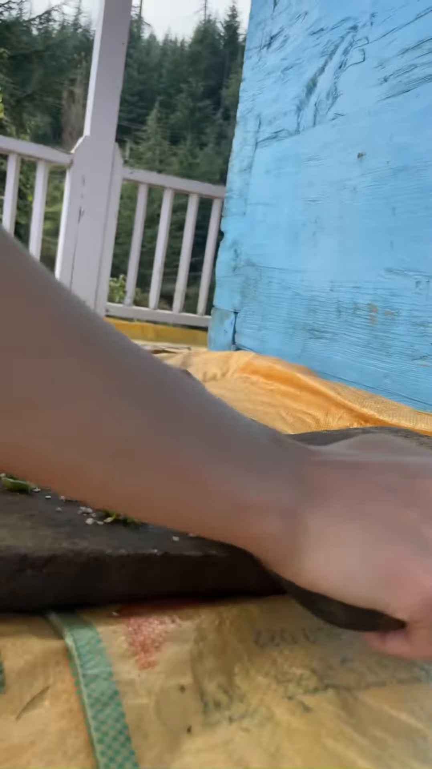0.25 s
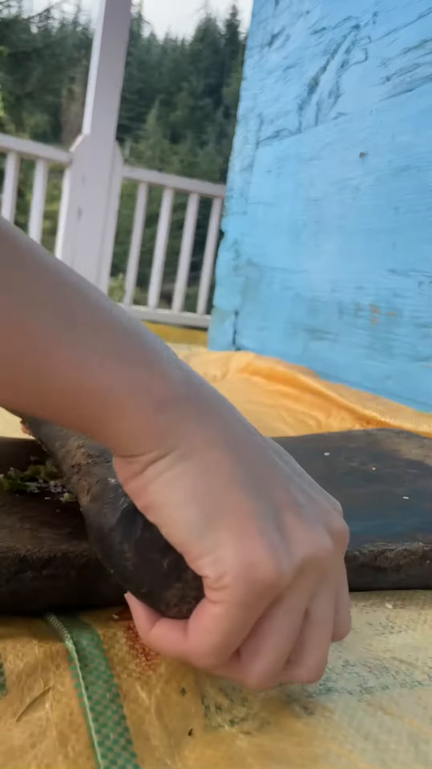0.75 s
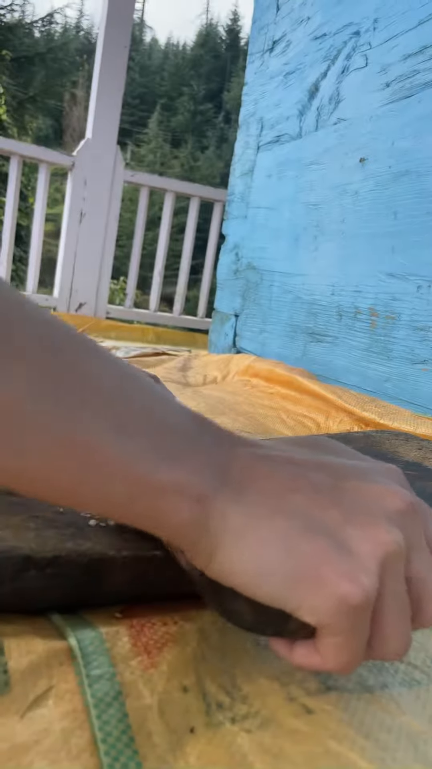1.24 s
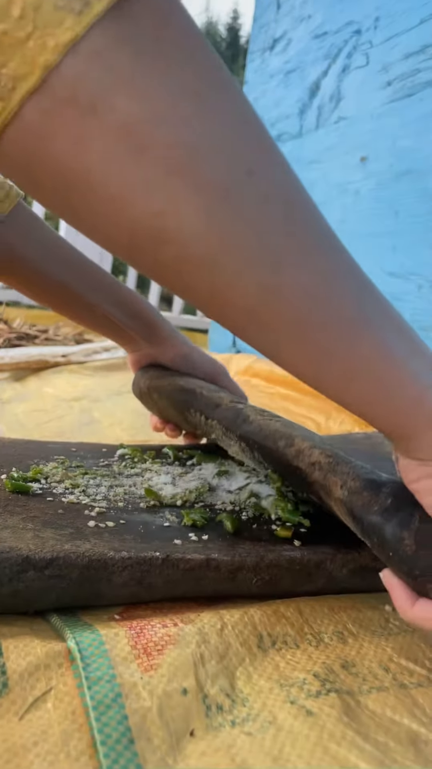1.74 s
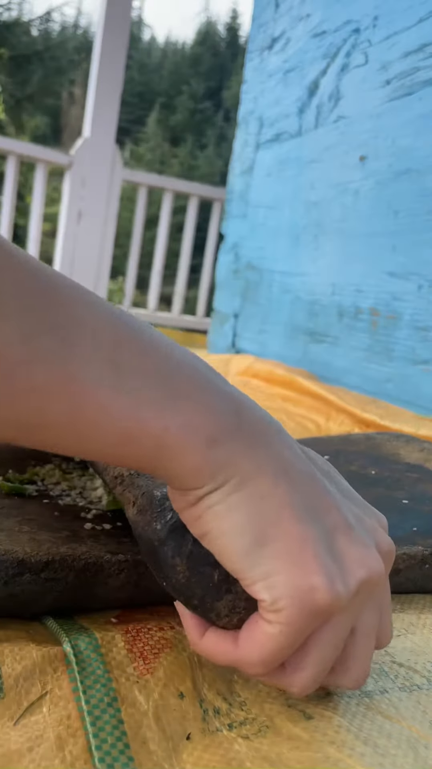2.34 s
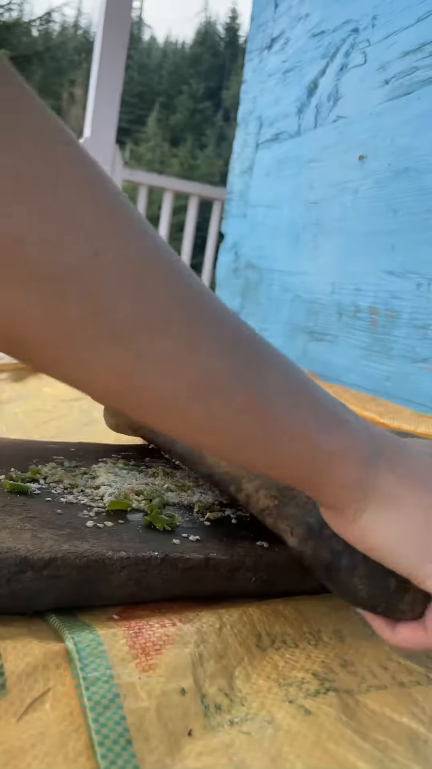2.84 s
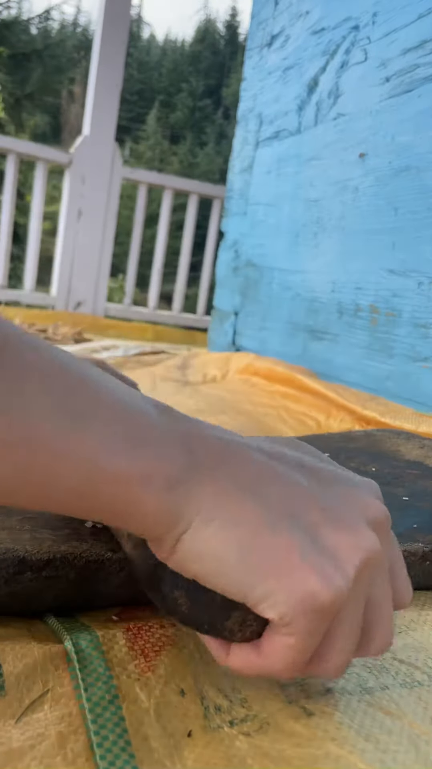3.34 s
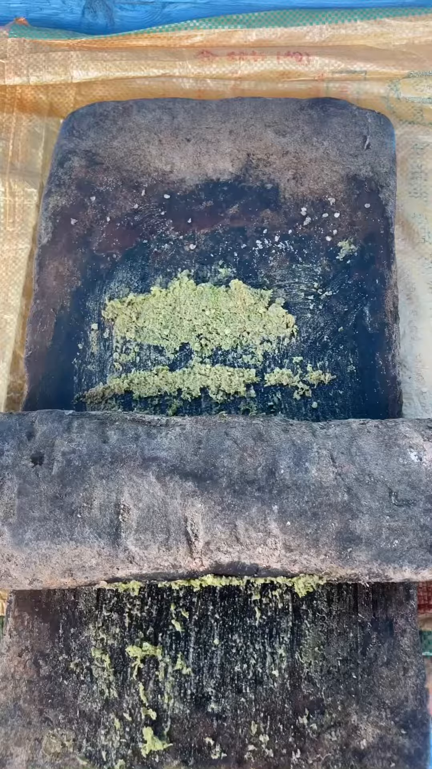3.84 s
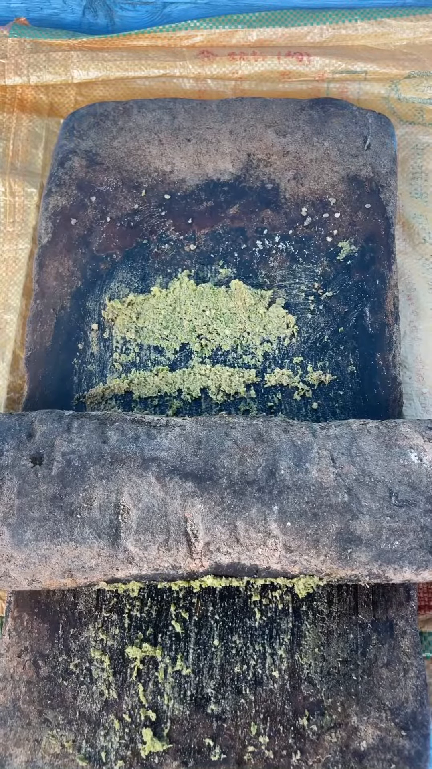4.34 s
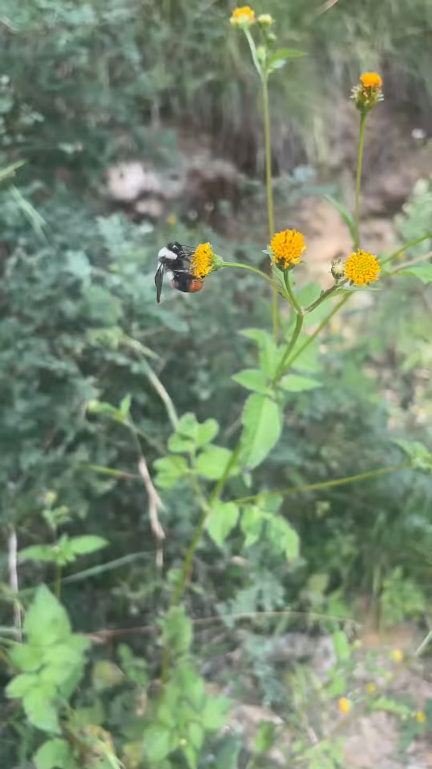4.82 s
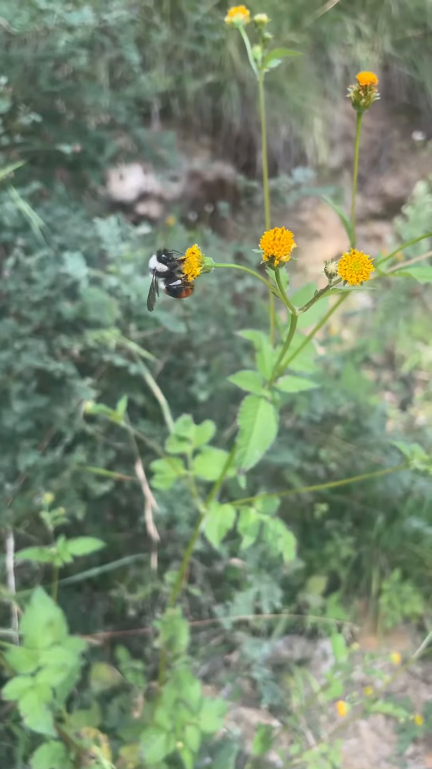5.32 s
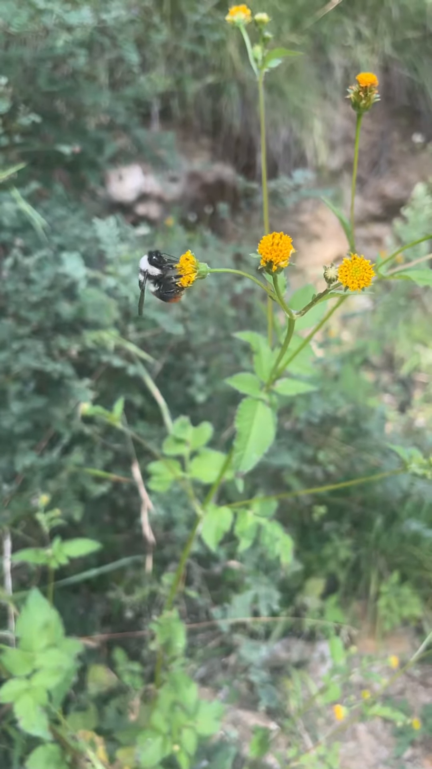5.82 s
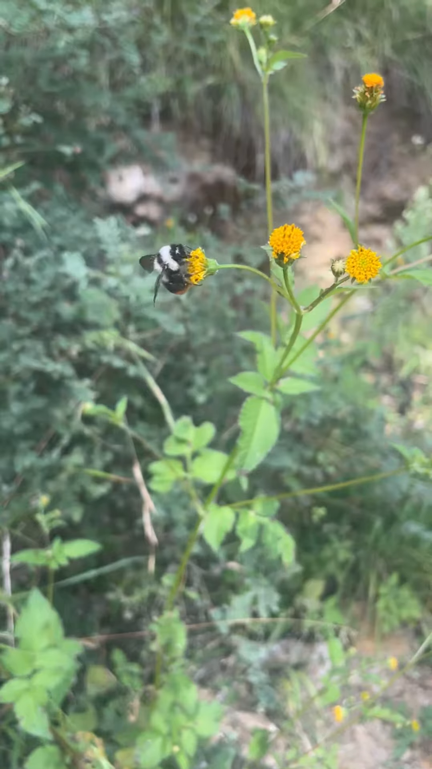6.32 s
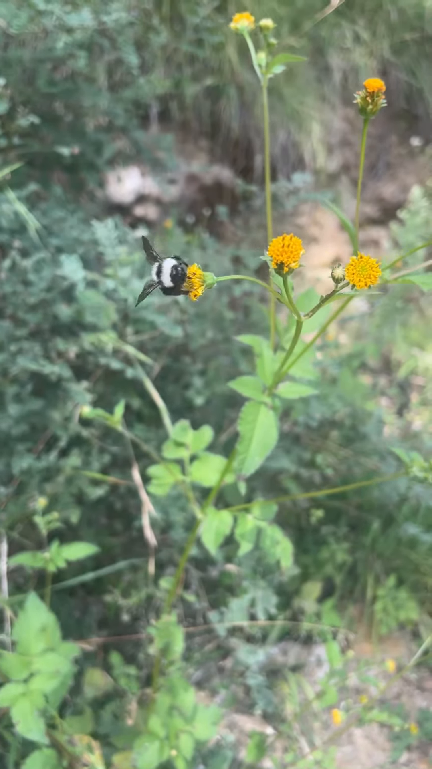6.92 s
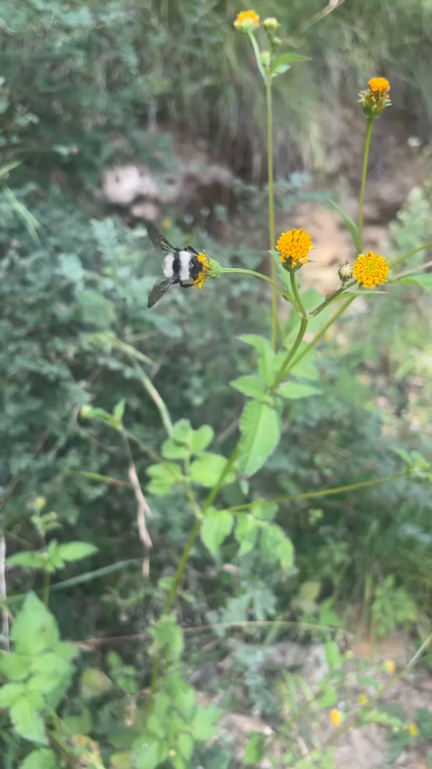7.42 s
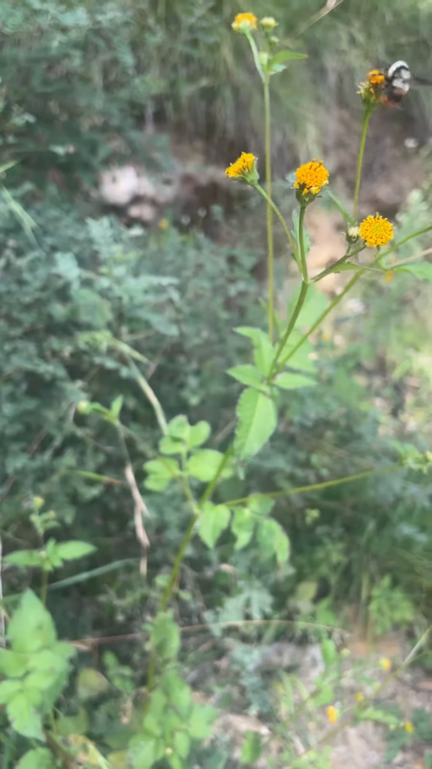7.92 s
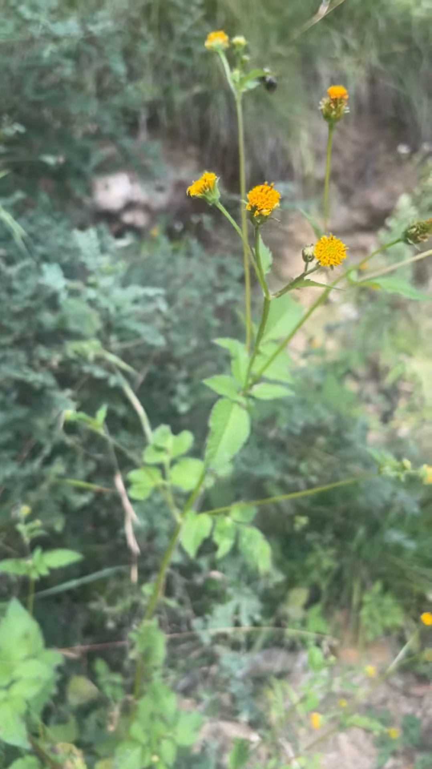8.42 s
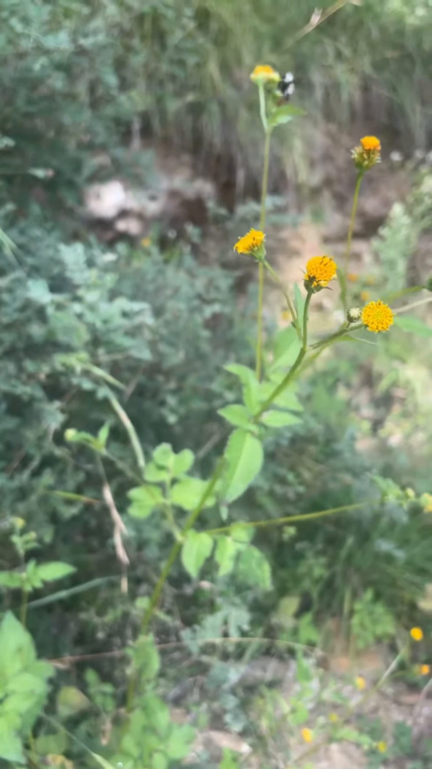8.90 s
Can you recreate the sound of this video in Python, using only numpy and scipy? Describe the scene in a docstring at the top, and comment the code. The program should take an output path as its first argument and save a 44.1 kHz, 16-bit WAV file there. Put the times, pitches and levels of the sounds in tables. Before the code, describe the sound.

Close by on a porch, a stone roller crushes seeds on a slab in repeated gritty strokes, with small snaps, rumbling floorboards and one loud knock. Faint cicadas and a bird sound beyond. The grinding stops, and after a quiet second the sound cuts to a meadow full of loud cicadas. Light wind buffets the handheld microphone and a bumblebee buzzes off in short bursts.

```python
"""Grinding stone on a porch, then a meadow.

Close by, a stone roller crushes seeds on a slab and shakes the porch boards; cicadas and a bird are outside.
After a quiet second we stand in a meadow: loud cicadas click all around, light wind buffets the
handheld microphone pair and a bumblebee buzzes off. The last instant is the porch again.
In the treble, bands lie alternately in and out of phase between left and right."""
import sys
import numpy as np
from scipy import signal
from scipy.fft import rfft, irfft
from scipy.io import wavfile
from scipy.ndimage import uniform_filter1d

SR = 44100
rng = np.random.default_rng(int(sys.argv[2]) if len(sys.argv) > 2 else 0)


def generate_wav(signal):
    """Clip the signal to [-1, 1] and save it as 16-bit WAV at the path in sys.argv[1]."""
    frames = np.transpose(np.atleast_2d(signal))
    scaled = np.clip(frames, -1, 1) * 32767
    pcm = np.round(scaled).astype(np.int16)
    wavfile.write(sys.argv[1], SR, pcm)


N = 403956
STILL_S, MEADOW_S, BACK_S = 3.815, 4.822, 9.113  # grinding stops; meadow begins; back on the porch

# stereo spread of each place and of the treble: f/Hz, left lead/rad, likeness/0-1, left minus right/dB
PORCH_STEREO = [(30, 0, 0.99, 0), (150, 0, 0.99, 1.5), (307, 0.96, 0.94, 3.5), (546, -1.84, 0.83, 5.5),
                (930, -2, 0.94, -0.5), (1299.6, -2, .4, -2.5), (1670, 1.8, .75, 0.5),
                (2300, 0.49, .75, -3.5), (3020, 2, 0.2, -2.5), (3770, 1.4, 0.39, 0.5),
                (4230, 1.34, 0.68, -3), (4830, 1.5, 1, 0), (5170, -0.57, .92, 0)]
MEADOW_STEREO = [(30, 0, 0.56, -0.5), (299, -0.5, 0.075, 1.5), (532, -4, 0.55, 4), (930, -1, 0.18, 0),
                 (1370, -1.5, 0.07, -1.5), (1860, 1.4, 0.1, -1.5), (2630, 3.5, 0.81, 2.5),
                 (2890, 2.5, 1, -1), (2980, -3.5, 0.7, 2), (3650, 0.2, 0.25, 2.5), (4390, 2, .5, -0.5),
                 (4720, 3, 0.54, 1.5), (4830, .5, 0.95, 1.5), (5130, -0.14, 0.84, 0)]
TREBLE_STEREO = [(7100, 2.8, .97, .5), (7230, np.pi, 1, 0), (8400, np.pi, 1, 0), (9390, 3.8, .7, -0.5),
                 (9750, 5.9, .8, 0), (10400, 2 * np.pi, 0.96, 1), (11700, 2 * np.pi, 1, -1.5),
                 (12500, 7, .6, 0.5), (13260, 3 * np.pi, 1, 0), (15190, 3 * np.pi, 1, 0),
                 (15800, 9, .8, -2.5)]
# spectra of the faint background air: f/Hz, density/dB
PORCH_AIR = [(25, -17), (45, -5), (80, 4), (130, -6.5), (250, -12), (500, -15), (750, -4.5), (950, -16),
             (1300, -25.5), (2000, -24.5), (3000, -20), (3600, -26)]
MEADOW_AIR = [(25, -7), (45, 7.5), (80, -2), (130, -6), (250, -4), (500, -3), (750, 0.5), (950, -13.5),
              (1300, -21.5), (2000, -40), (3000, -43), (3600, -16.5)]
# spectra of the cicada chorus: f/Hz, density/dB
PORCH_CICADAS = [(3000, -29), (3700, -22.5), (4200, -10.5), (4800, -1.5), (5300, 1.5), (6200, -5.5),
                 (7200, -10.5), (7900, -24.5), (8800, -34.5), (9800, -27), (11700, -15.5), (14000, -15.5),
                 (15500, -26)]
MEADOW_CICADAS = [(3000, -52.5), (3700, -29), (4200, -16.5), (4800, -3.5), (5500, -0.5), (6900, 0),
                  (7600, -7.5), (8300, -15), (8900, -32), (9600, -29.5), (11500, -27), (13000, -33.5),
                  (15500, -30)]
# course of the chorus: t/s, level/dB, overtone band boost/dB
PORCH_CHORUS = [(0, -55, -4), (1, -52, 1.5), (2, -53, 1.5), (3.8, -53.5, -1.5), (3.83, -54.5, -1),
                (4.3, -54, 4), (4.81, -54, -1)]
MEADOW_CHORUS = [(4.83, -37, -0.071), (6.8, -38, -0.24), (8.12, -37, 1), (9.039, -35.5, -1.15)]
# meadow cicadas near the microphone: f/Hz, width/Hz, level/dB, pulse rate/Hz, sounding share/0-1
SINGERS = [(4524, 86, -58.5, 34, 0.85), (5130, 135, -51, 31.1, 0.64), (6080, 210, -49.5, 51, 1),
           (6660, 130, -48.5, 31.1, 0.94), (7210, 250, -48, 35.3, 0.43), (7870, 210, -50, 23, 0.48)]
# breeze between the gusts: t/s, level/dB
BREEZE = [(4.82, -80.5), (6.15, -65), (7.2, -67.5), (9.16, -62.5)]
# gusts on the microphone: t/s, rush/dB, thump peak/dB, thump f/Hz
GUSTS = [(5.64, -71.5, -65.5, 55), (6.108, -50.5, -56, 46), (6.53, -55.5, -54, 48.1), (6.833, -56, -34, 62),
         (7.279, -58, -61.5, 54.4), (7.48, -59.5, -64.5, 56), (7.998, -49.5, -60, 65.6),
         (8.111, -54, -47.5, 61.9), (8.528, -49.5, -52, 53.3), (8.789, -49.5, -47, 64.3),
         (9.05, -53.5, -60.5, 57.3)]
# fingers on the microphone: t/s, level/dB
FINGER_TAPS = [(5.975, -53), (7.883, -61), (8.107, -56), (8.528, -57), (8.71, -66)]
# bird notes, and faint low hums on the porch: t/s, length/s, from f/Hz, to f/Hz, level/dB, waver/Hz
BIRD_NOTES = [(.305, 0.076, 3480, 3370, -63, 80), (.43, 0.085, 2910, 2860, -52.5, 11),
              (4.14, 0.045, 3103, 2970, -65, 240), (4.135, 0.072, 2390, 2286, -69, 160),
              (4.19, 0.32, 2915, 2500, -68, 55), (4.46, 0.13, 2470, 2550, -68.5, 110)]
HUMS = [(2.25, 0.37, 244.4, 258.8, -58, 7.7), (2.74, 0.14, 209, 214, -50.5, 4.9),
        (2.79, 0.06, 387.6, 436, -51, 6.9), (2.98, 0.044, 387, 408, -53, 8)]
# envelope of the bee's wing harmonics: f/Hz, level/dB
WING_SPECTRUM = [(170, -2), (380, 1), (570, -2.5), (780, -6.5), (1000, -17), (1400, -19.5), (2300, -19.5)]
# air torn off the wings: f/Hz, density/dB
WHIRR_SPECTRUM = [(300, -39), (700, 2), (1200, -6), (2400, -19), (3200, -14.5)]
# buzzes, each a hover with one surge: t/s, length/s, hover level/dB, hover f/Hz,
# surge delay/s, surge half width/s, surge boost/dB, pitch lift/Hz, relative whirr/dB
BUZZES = [(7.465, 0.43, -55, 172, .13, 0.085, 5, 20, -16.5),
          (7.99, 0.29, -67, 185.5, 0.16, 0.03, 14.5, 11.5, -3.5),
          (8.302, .27, -73.5, 183.3, 0.19, 0.042, 6.5, -4.5, -2),
          (8.601, 0.3, -63, 184, 0.0575, 0.049, -3, 6, -18), (8.94, .17, -78, 187.4, 0.074, .05, 0, 3, 3)]
# modes of the porch boards: f/Hz, width/Hz, level/dB
BOARD_MODES = [(44.8, 24, -7), (70, 16, 0), (98, 25, 2), (126, 20, 4), (193, 34, -6.5), (262.6, 18, -19.5),
               (397, 90, -29)]
# modes of the two stones: f/Hz, level/dB, t60/s
SLAB_MODES = [(189, -8, 0.083), (270, -10.5, 0.076), (377.4, -19.5, 0.11), (608.3, 3, 0.09),
              (805.3, -14.5, 0.05), (895.6, 3, 0.027), (989, -10, 0.025), (1230, -27.5, 0.019),
              (1797, -23.5, 0.07), (1940, -17, 0.022), (2212, -24.5, 0.05)]
ROLLER_MODES = [(880, -3.5, 0.024), (962, -2, 0.051), (1240, -7, 0.03), (1780, -16.5, 0.034),
                (2370, -9.5, 0.016), (2784, -22.5, 0.018), (3270, -20, 0.031)]
# their ring bends as the load on the slab shifts and the roller tips: t/s, pitch factor
SLAB_BEND = [(0, 0.93), (.2, 1.035), (.5, 1.01), (.6, 0.98), (0.729, 1.01), (1.0, 1.02), (1.05, 0.99),
             (1.15, 1.045), (1.8, 0.99), (1.9, 1.01), (2.05, 0.98), (2.5, 1.05), (2.59, .94), (2.69, 1.01),
             (3.0, 0.97), (3.06, 0.98), (3.14, 1), (3.45, 0.98), (3.6, 1.07)]
ROLLER_BEND = [(1.6, 0.93), (1.72, 1.03), (1.93, 1.07), (2.0, 1.04), (2.2, .995), (2.4, 0.86)]
# spectra of coarse grit, fine grit and the rattle after a blow: f/Hz, density/dB
COARSE_GRIT = [(700, -29.5), (1100, -7), (1400, -13), (2100, -4), (3000, -2.5), (4200, -6.5), (6000, -7.5),
               (9000, -23), (15500, -38)]
FINE_GRIT = [(2500, -29), (4200, -8.5), (5300, -2), (6700, -4.5), (8300, 1), (9500, -3), (11000, -7),
             (12000, -11), (15500, -17)]
RATTLE = [(300, -29.5), (700, -3.5), (1000, 1), (1400, -15), (2200, -9), (3200, -27), (6000, -42)]
# boards jolt under the slab: t/s, peak/dB, f/Hz, t60/s, hollow knock/dB
THUDS = [(0.083, -30.5, 88.7, 0.13, -56), (0.198, -34, 99, 0.22, -58), (0.626, -31, 73, 0.082, -65),
         (0.833, -44, 109, 0.32, -65), (0.934, -30.5, 93, 0.053, -35), (1.242, -44.5, 214, 0.17, -42),
         (1.247, -49, 385, 0.092, -58), (1.599, -15, 87.3, 0.15, -31), (1.62, -14, 109.1, 0.091, -35.5),
         (1.669, -24, 96.2, 0.16, -37), (2.574, -28.5, 134, 0.087, -31.5), (2.6, -32, 117.1, 0.069, -33),
         (3.015, -28, 56.3, 0.2, -51), (3.149, -34.5, 104.1, 0.29, -62), (3.379, -24.5, 151.5, 0.062, -24),
         (3.401, -18, 104.6, 0.03, -28), (3.732, -32.5, 70.1, 0.19, -58), (3.777, -27.5, 41, 0.054, -65)]
# seeds snap: t/s, ring/dB, f/Hz, crack/dB
SNAPS = [(0.2312, -36.5, 1090, -61), (0.577, -58, 2390, -40), (0.7021, -43, 2374, -34),
         (0.753, -42.5, 1281, -56), (0.945, -59, 2430, -42), (2.234, -64, 2260, -60),
         (2.317, -62, 2400, -49.5), (2.7213, -46, 1510, -64), (3.099, -40, 1960, -38),
         (3.199, -53, 1030, -57)]
# roller strikes the slab: t/s, peak/dB, contact/ms, roller ring against slab/dB
KNOCKS = [(0.194, -34, 1.9, -13), (1.592, -3, 0.47, -6.5), (2.573, -51, 1.3, -1), (2.674, -41, 1.1, -9),
          (3.05, -30.5, 0.56, -1), (3.376, -21.5, 1.63, -1)]
# roller strokes: t/s, rise of weight/s, of coarse grit/s, of fine grit/s, length/s, lift-off/s,
# then five layers: boards/dB, slab/dB, roller/dB, coarse grit/dB, fine grit/dB
STROKES = [(-.1, 0.27, .17, 0.21, 0.33, 0.068, -35.5, -46, -68, -48.5, -42),
           (0.314, 0.36, 0.14, .15, 0.43, 0.075, -41.5, -52.5, -58.5, -54.5, -47.5),
           (0.84, 0.22, 0.22, 0.2, 0.3, 0.098, -37.5, -48.5, -64, -53.5, -46),
           (1.172, 0.094, 0.059, 0.054, .11, 0.11, -48.5, -61, -63.5, -58, -58),
           (1.573, 0.33, 0.42, 0.39, .53, 0.12, -34.5, -37.5, -42, -53, -57),
           (2.336, 0.26, 0.223, 0.26, 0.35, 0.083, -37, -45.5, -56.5, -48.5, -44),
           (2.771, 0.302, 0.213, 0.077, 0.388, 0.063, -39.5, -47.5, -55, -52, -48),
           (3.218, 0.36, 0.29, 0.32, 0.34, 0.086, -35.5, -43, -58.5, -48.5, -43),
           (3.653, 0.056, 0.17, 0.1, 0.24, 0.047, -49, -61.5, -64.5, -52, -48)]
# a stroke's shape, one row per layer: rise depth/dB, rise exponent, sag/dB, loss per lift-off time/dB
STROKE_SHAPES = [(21.3, 1, 2.5, 12.5), (31, 1.2, 9, 29), (26, 1.3, 9.5, 24), (24.4, 1.6, 2.5, 26),
                 (24.2, 1.6, 2.5, 29.5)]
# the roller bites or slips: t/s, half width/s, swell of boards/dB, of slab/dB, of roller/dB
BITES = [(.15, .04, 1.5, 0, 1), (.7, 0.022, 2.5, 4, -6), (1.06, .04, -4.5, 5.5, 3), (1.15, 0.022, 2, 8, 2),
         (1.83, 0.025, -4, -1, 1), (1.87, 0.017, -3.5, -2, 1), (1.94, 0.022, -0.5, 0.5, 3.5),
         (2.015, 0.014, 2, 5, 0), (2.09, .025, 0.5, -2.5, 3), (2.48, 0.023, 1.5, 1, -1),
         (2.95, 0.027, 1.5, 3, 6), (3.13, 0.017, -3, 1, 6), (3.465, 0.024, 4, 4, -5),
         (3.53, 0.017, -1.5, 6.5, -4), (3.6, .025, 5, 14, 5)]
# a heap of seeds gives way: t/s, half width/s, swell of coarse grit/dB, of fine grit/dB
CRUNCHES = [(.50, 0.022, 3.5, 2), (1.88, 0.034, -0.5, 4), (2.10, 0.05, -0.5, 8.5), (2.33, 0.022, 8, 11),
            (2.55, 0.05, 3.5, 3), (2.635, 0.029, 7, 6), (2.87, 0.049, 3.5, 1.5), (3.075, 0.049, 7.5, 8.5),
            (3.3, 0.026, 5, 9), (3.56, .03, 3, -1.5)]

TIME, FREQS = np.arange(N) / SR, np.fft.rfftfreq(N, 1 / SR)


def gain_of(db):
    """dB to gain."""
    return 10 ** (np.asarray(db) / 20)


def unit_rms(x):
    """Scales to rms 1."""
    return x / np.sqrt(np.mean(x ** 2) + 1e-20)


def over_frequency(table, hz):
    """Columns of a table over log frequency."""
    f, *columns = np.transpose(table)
    return [np.interp(np.log(hz + 1), np.log(f + 1), c) for c in columns]


def over_time(table):
    """Columns of a table at every sample."""
    s, *columns = np.transpose(table)
    return [np.interp(TIME, s, c) for c in columns]


def add(mix, s, sound):
    """Mixes a sound in from second s."""
    part = mix[round(s * SR):][:len(sound)]
    part += sound[:len(part)]


def coloured(x, spectrum):
    """Filters by a spectrum and scales to rms 1."""
    return unit_rms(irfft(rfft(x) * gain_of(over_frequency(spectrum, FREQS)[0]), N))


def wander(hz):
    """A random curve that turns about hz times a second, rms 1."""
    knots = rng.standard_normal(int(N / SR * hz) + 2)
    return unit_rms(np.interp(TIME * hz, np.arange(len(knots)), knots))


def ring(hz, t60, rise_s, seconds):
    """A mode that swells over rise_s and dies away."""
    t = np.arange(round(seconds * SR)) / SR
    return gain_of(-60 * t / t60) * -np.expm1(-t / rise_s) * np.sin(2 * np.pi * hz * t)


def gate(start, end):
    """1 between two moments, with quick ramps."""
    return np.clip((TIME - start) / 0.0032, 0, 1) * np.clip((end - TIME) / 0.00061, 0, 1)


def with_echo(x):
    """Two rows: the direct sound and a twin scattered by surfaces near the microphone."""
    scatter = rng.standard_normal(1500) * gain_of(-60 * np.arange(1500) / SR / 0.065)
    scatter -= uniform_filter1d(scatter, size=151)  # long waves pass unscattered
    return np.array([x, signal.oaconvolve(x, scatter / np.linalg.norm(scatter))[:N]])


def stereo_spread(pair, spread):
    """Left and right from a sound and its twin: likeness, phase turn and balance over frequency."""
    phase, likeness, left_db = over_frequency(spread + TREBLE_STEREO, FREQS)
    direct, twin = rfft(pair)
    angle = np.arccos(np.clip(likeness, 0, 1)) / 2
    mid, side = np.cos(angle) * direct, np.sin(angle) * twin
    lean = gain_of(left_db / 2) * np.exp(.5j * phase)
    return irfft(np.array([(mid + side) * lean, (mid - side) / lean]), N)


def background_air(spectrum, db, patchy_db, drift_db):
    """Faint background air: a low wash of noise that flickers in patches."""
    bins = signal.stft(coloured(rng.standard_normal((2, N)), spectrum), nperseg=1024)[2]
    patches = uniform_filter1d(rng.standard_normal(bins.shape[1:]), size=6, axis=0)
    patches = unit_rms(uniform_filter1d(patches, size=8, axis=1))
    wash = signal.istft(bins * gain_of(patchy_db * patches), nperseg=1024)[1][:, :N]
    return unit_rms(wash) * gain_of(db + drift_db * wander(10))


def cicada_chorus(spectrum, course, clicks_per_s, throb_db, overtone_hz=8800):
    """All around, many membranes click at random into their body resonance; the chorus throbs a little."""
    clicks = rng.standard_normal((2, N)) * (rng.random(N) < clicks_per_s / SR)
    chorus = coloured(clicks, spectrum)
    overtone = irfft(rfft(chorus) * (FREQS > overtone_hz), N)
    db, overtone_db = over_time(course)
    return (chorus + (gain_of(overtone_db) - 1) * overtone) * gain_of(db + throb_db * wander(35))


def near_cicadas():
    """Each near insect rings one narrow body resonance with bursts at an almost steady rate."""
    out = np.zeros(N)
    for centre_hz, width_hz, db, rate, share in SINGERS:
        beat = (np.cumsum(rate * (1 + 0.0204 * wander(3))) / SR + rng.random()) % 1
        burst = np.sin(np.pi * np.minimum(beat / share, 1)) ** 2
        body = 1 / (1 + ((FREQS - centre_hz) / width_hz) ** 2)
        level = gain_of(db + 0.7 * wander(1.5))
        out += level * unit_rms(irfft(rfft(burst * rng.standard_normal(N)) * body, N))
    return with_echo(out)


def wind(rise_db_per_s=165, fall_db_per_s=187):
    """Lumpy low pressure right on the microphone; a gust swells, thumps once and dies down."""
    thumps, level_db = np.zeros(N), over_time(BREEZE)[0]
    for s, rush_db, thump_db, hz in GUSTS:
        below_top_db = np.maximum(rise_db_per_s * (s - TIME), fall_db_per_s * (TIME - s))
        level_db = np.maximum(level_db, rush_db - below_top_db)
        thump = ring(hz, 0.11, 0.013, .3)
        add(thumps, s, gain_of(thump_db) * thump / abs(thump).max())
    gusts = rng.standard_normal((2, N)) * gain_of(level_db + 3.5 * wander(25)) * gate(MEADOW_S, BACK_S)
    rumble = coloured(gusts, [(20, -31), (45, 3), (70, 2), (110, -9), (200, -38), (400, -58)])
    return rumble * np.sqrt(np.mean(gusts ** 2)) + with_echo(thumps)


def finger_taps():
    """Fingers shift on the microphone with dull ticks."""
    out = np.zeros(N)
    tick = ring(240, 0.021, 0.001, .04) + ring(540, 0.016, 0.00055, .04)
    tick += 1.2 * ring(864, 0.03, 0.00058, .04)
    for s, db in FINGER_TAPS:
        add(out, s, gain_of(db) * tick)
    return out


def glides(notes, waver_hz, hoarse_db, arch_db, curve):
    """Sines that glide, swell and fade, while pitch and level waver at random."""
    out, waver, hoarse = np.zeros(N), wander(waver_hz), wander(0.49 * waver_hz)
    for start, length, from_hz, to_hz, db, depth_hz in notes:
        u = np.linspace(0, 1, round(length * SR))
        at = slice(round(start * SR), round(start * SR) + len(u))
        hz = from_hz + (to_hz - from_hz) * u ** curve + depth_hz * waver[at]
        level = gain_of(db - arch_db * (2 * u - 1) ** 2 + hoarse_db * hoarse[at])
        add(out, start, level * np.sin(2 * np.pi * np.cumsum(hz) / SR) * signal.windows.tukey(len(u), .15))
    return out


def bird():
    """Faint, hoarse whistles from beyond the porch."""
    return glides(BIRD_NOTES, waver_hz=900, hoarse_db=2.8, arch_db=.8, curve=2.4)


def low_hums():
    """Faint rising tones among the later strokes."""
    return glides(HUMS, waver_hz=40, hoarse_db=1.58, arch_db=14.2, curve=0.93)


def bumblebee(airborne_s=7.5, far_whirr_db=-72.5, flutter_db=3, shimmer_db=3.5, fade_db=-8):
    """Wing-beat harmonics, steady in a surge and wavering in the hover; each beat puffs air."""
    out, jitter, drift, flutter = np.zeros(N), wander(80), wander(25), wander(22)
    puffs = coloured(rng.standard_normal(N), WHIRR_SPECTRUM)
    for start, length, hover_db, hover_hz, surge_s, width, surge_db, lift_hz, whirr_db in BUZZES:
        t = np.arange(0, length, 1 / SR)
        at = slice(round(start * SR), round(start * SR) + len(t))
        u = (t - surge_s) / width
        surge = np.exp(-u ** 4)
        loose = 1 - 0.89 * surge
        hz = hover_hz + lift_hz * surge * (1 - .15 * u)  # the lift sags through the surge
        turns = np.cumsum(hz * (1 + loose * (0.0122 * jitter[at] + 0.03 * drift[at]))) / SR
        swell = np.exp(-(u - 0.4) ** 2)  # loudness trails the pitch
        buzz = gain_of(whirr_db) * puffs[at] * (1 + 0.2 * np.cos(2 * np.pi * turns))
        for k in range(1, 14):  # harmonics brighten in the swell and each flickers alone
            harmonic_db = over_frequency(WING_SPECTRUM, k * hz)[0] + 0.95 * k * (swell - 1.27)
            flicker = (0.7 + .6 * loose) * np.tanh(np.roll(jitter + drift, k * SR // 4)[at])
            buzz += gain_of(harmonic_db + shimmer_db * flicker) * np.sin(2 * np.pi * k * turns)
        db = hover_db + surge_db * swell + fade_db * (t / length) ** 2 + flutter_db * loose * flutter[at]
        add(out, start, gain_of(db) * signal.windows.tukey(len(t), 0.14) * buzz)
    return out + puffs * gain_of(far_whirr_db + flutter_db * flutter) * gate(airborne_s, BACK_S)


def board_thuds():
    """The boards jolt under the slab, with a short hollow knock from their higher modes."""
    out = np.zeros(N)
    hollow = ring(195, 0.11, 0.0034, .1) + ring(250, 0.079, 0.0038, .1)
    hollow += 0.54 * ring(290, 0.015, 0.0018, .1)
    for s, db, hz, t60, hollow_db in THUDS:
        jolt = ring(hz, t60, 0.0041, .3)
        add(out, s, gain_of(db) * jolt / abs(jolt).max())
        add(out, s, gain_of(hollow_db) * hollow)
    return out


def seed_snaps():
    """A seed breaks: a short ring with an overtone and a bright crack."""
    out, t = np.zeros(N), np.arange(round(.03 * SR)) / SR
    cracks = rng.standard_normal((len(SNAPS), len(t))) * gain_of(-60 * t / 0.018)
    for (s, db, hz, crack_db), crack in zip(SNAPS, cracks):
        ping = ring(hz, 0.018, 0.00022, .03) + 0.52 * ring(2.05 * hz, 0.01, .0003, .03)
        add(out, s, gain_of(db) * ping + gain_of(crack_db) * np.diff(crack, prepend=0))
    return out


def stone(modes):
    """Impulse response of a stone; a mode needs a few cycles to swell."""
    return sum(gain_of(db) * ring(f, t60, 1.5 / f, .25) for f, db, t60 in modes)


def roller_knocks():
    """A blow rings slab and roller with a brief rattle; a short contact reaches the higher modes."""
    out, slab, roller = np.zeros(N), stone(SLAB_MODES), stone(ROLLER_MODES)
    slab *= gain_of(-60 * TIME[:len(slab)] / 0.2)  # the landed roller damps the slab
    rattle = coloured(rng.standard_normal(N), RATTLE)[:4000]
    slab[:4000] += rattle * gain_of(-16 - 60 * TIME[:4000] / 0.1)
    for s, db, contact_ms, roller_db in KNOCKS:
        blow = signal.windows.hann(round(contact_ms * SR / 1000) + 3) ** 2
        knock = np.convolve(slab + gain_of(roller_db) * roller, blow)
        add(out, s - .001, gain_of(db) * knock / abs(knock).max())
    return out


def stroke_levels():
    """dB curves of the five layers: each stroke rises to full, sags and lifts off."""
    t, power = np.arange(0, STILL_S + .1, .002), 1e-12
    depth_db, curve, sag_db, loss_db = np.transpose(STROKE_SHAPES)[..., None]
    for start, weight_s, coarse_s, fine_s, length, lift_s, *top_db in STROKES:
        top_s = np.array([[weight_s]] * 3 + [[coarse_s], [fine_s]])  # boards and stones follow the weight
        age = t - start
        rise = depth_db * np.maximum(1 - age / top_s, 0) ** curve + 400 * np.maximum(-age, 0)
        sag = sag_db * np.clip((age - top_s) / np.maximum(length - top_s, .01), 0, 1)
        lift = loss_db * np.maximum(age - length, 0) / lift_s
        power = power + gain_of(np.array(top_db)[:, None] - rise - sag - lift) ** 2
    return np.array(over_time(np.transpose([t, *10 * np.log10(power)])))


def swells(table):
    """dB curves made of bell-shaped swells, one curve per level column."""
    s, width, *swell_db = np.transpose(table)
    t = np.arange(0, STILL_S, .002)
    bells = np.exp(-((t - s[:, None]) / width[:, None]) ** 2)
    return over_time(np.transpose([t, *swell_db @ bells]))


def shaken(force, body):
    """A random force rings a body."""
    return signal.fftconvolve(force, body[None], axes=1)[:, :N] / np.linalg.norm(body)


def rubbed_stone(force, modes, bend):
    """Rubbing keeps a stone ringing; its pitch follows the bend curve."""
    place = np.cumsum(over_time(bend)[0])
    return np.array([np.interp(place, np.arange(N), x) for x in shaken(force, stone(modes))])


def grinding(grains_per_s=500, grain_spread_db=4, grain_s=.002):
    """Rough contact shakes boards, slab and roller; crushed seeds hiss. Rows: sound and unrelated twin."""
    levels_db = stroke_levels() + np.vstack([swells(BITES), swells(CRUNCHES)])
    boards_db, slab_db, roller_db, coarse_db, fine_db = levels_db
    t = TIME[:SR // 4]
    boards = sum(gain_of(db) * np.sqrt(width) * np.exp(-np.pi * width * t) * np.sin(2 * np.pi * hz * t)
                 for hz, width, db in BOARD_MODES)
    catch = wander(45)  # the roller catches and slips, all layers at once
    force = rng.standard_normal((5, 2, N))
    rumble = shaken(force[0] * gain_of(boards_db + 0.96 * catch), boards)
    slab = rubbed_stone(force[1], SLAB_MODES, SLAB_BEND)
    slab *= gain_of(slab_db + 0.81 * catch + 1.5 * wander(60))
    roller = rubbed_stone(force[2], ROLLER_MODES, ROLLER_BEND)
    roller *= gain_of(roller_db + .6 * catch + 1.5 * wander(70))
    crackle = gain_of(0.57 * catch + 1.6 * wander(600) + .5 * wander(9.1))  # grains crush unevenly
    sizes = gain_of(grain_spread_db * np.minimum(rng.exponential(1, N), 3))
    cracks = sizes * (rng.random(N) < grains_per_s / SR)  # single seeds inside the grit
    grains = 1 + .3 * signal.lfilter([1], [1, -np.exp(-1 / (grain_s * SR))], cracks)
    coarse = coloured(force[3] * crackle * grains, COARSE_GRIT) * gain_of(coarse_db)
    fine = coloured(force[4] * crackle, FINE_GRIT) * gain_of(fine_db)
    return (rumble + slab + roller + coarse + fine) * gate(-1, STILL_S)


def scene():
    """The microphone on the porch, in the meadow, and a last moment on the porch."""
    events = with_echo(roller_knocks() + board_thuds() + seed_snaps() + finger_taps()
                       + bumblebee() + bird() + low_hums())
    porch = events + grinding()
    porch += cicada_chorus(PORCH_CICADAS, PORCH_CHORUS, clicks_per_s=9000, throb_db=0.89)
    porch += background_air(PORCH_AIR, db=-64.5, patchy_db=2.8, drift_db=1.2)
    meadow = events + wind() + near_cicadas()
    meadow += cicada_chorus(MEADOW_CICADAS, MEADOW_CHORUS, clicks_per_s=14000, throb_db=0.21)
    meadow += background_air(MEADOW_AIR, db=-63.5, patchy_db=3.3, drift_db=0.38)
    in_meadow = gate(MEADOW_S - .004, BACK_S)
    return (stereo_spread(porch, PORCH_STEREO) * (1 - in_meadow)
            + stereo_spread(meadow, MEADOW_STEREO) * in_meadow)


def record(dry):
    """The microphone loses the bass below 32 Hz; the treble ends at 15.8 kHz."""
    thin = signal.sosfilt(signal.butter(3, 32, "high", fs=SR, output="sos"), dry)
    return signal.oaconvolve(thin, signal.firwin(511, 15800, window=("kaiser", 9), fs=SR)[None], "same")


dry = scene()
out = record(dry)
generate_wav(out)
```